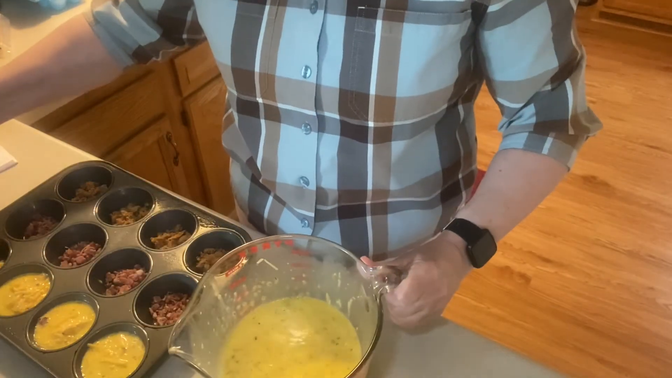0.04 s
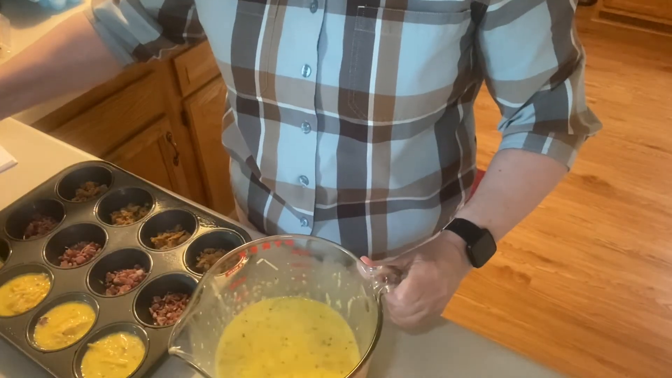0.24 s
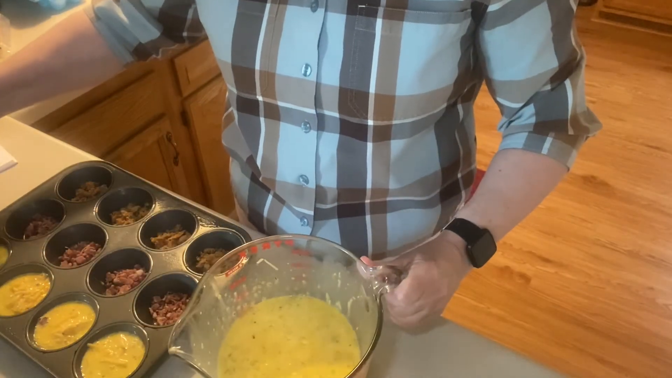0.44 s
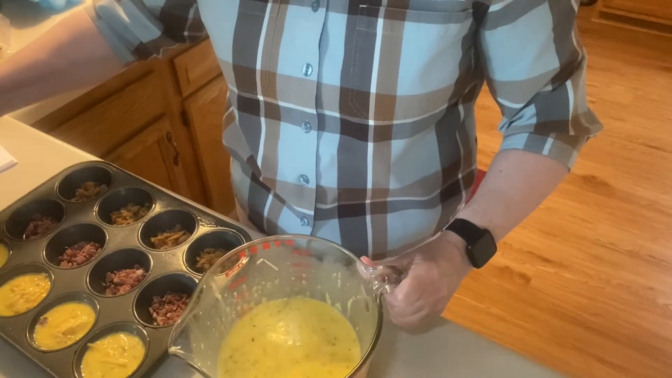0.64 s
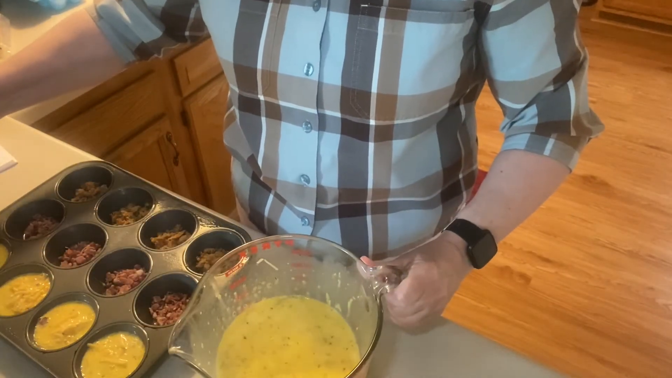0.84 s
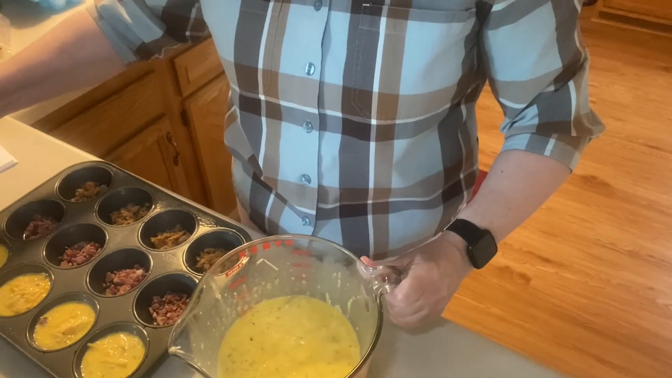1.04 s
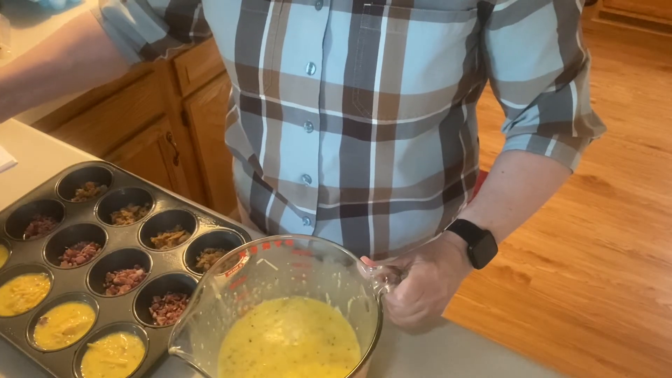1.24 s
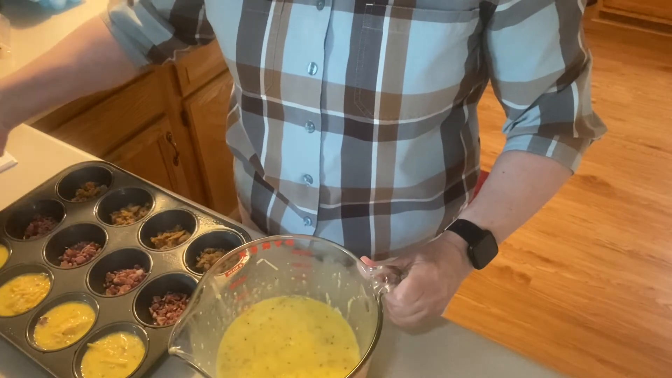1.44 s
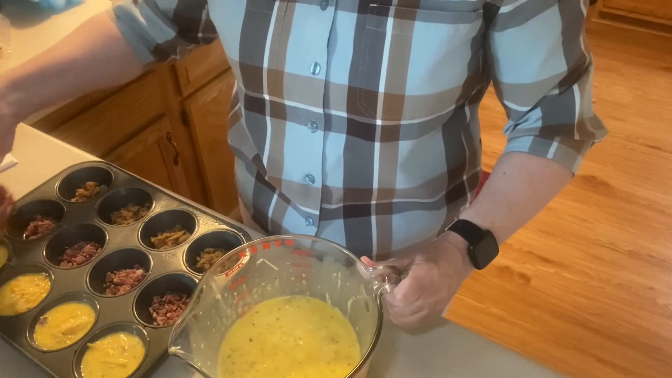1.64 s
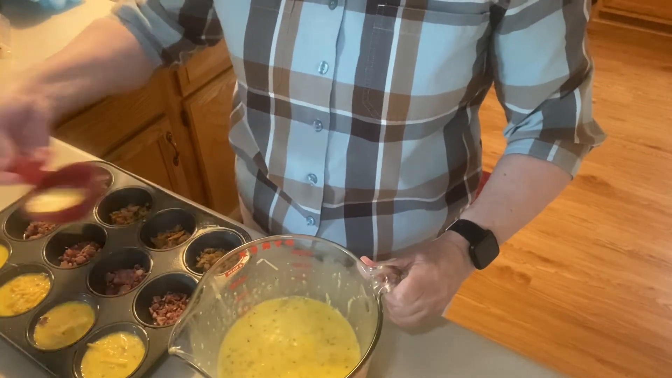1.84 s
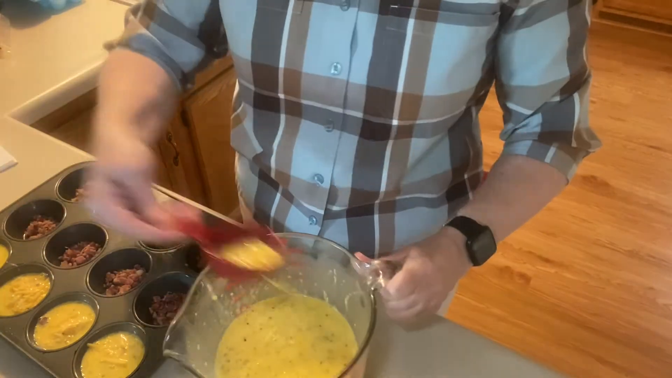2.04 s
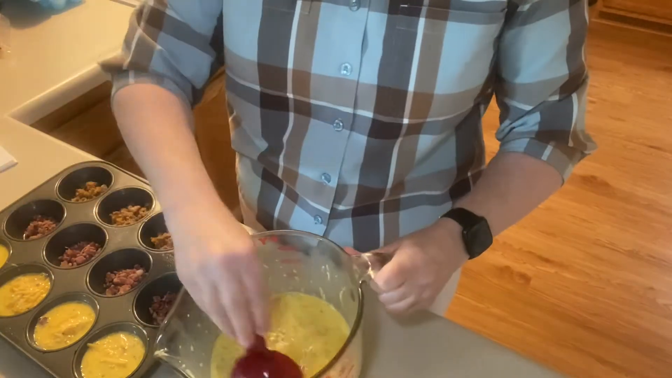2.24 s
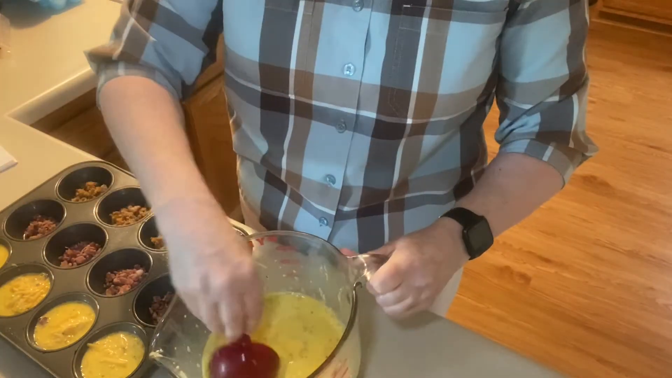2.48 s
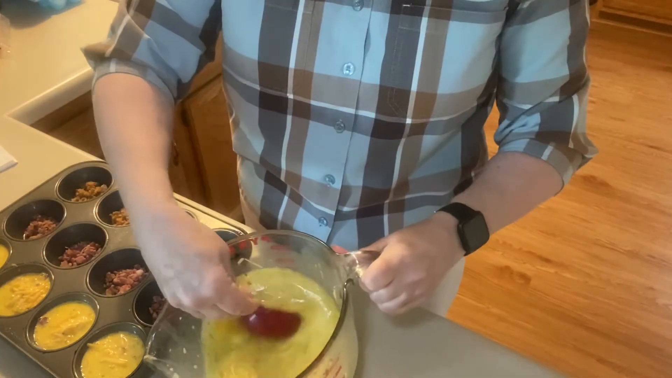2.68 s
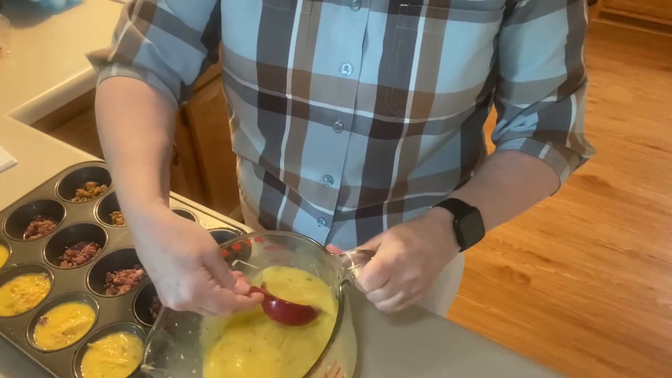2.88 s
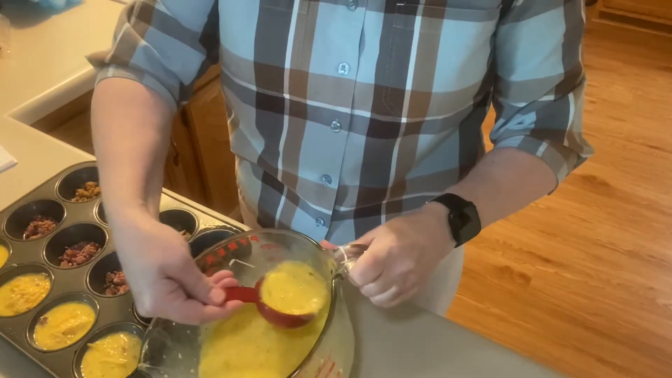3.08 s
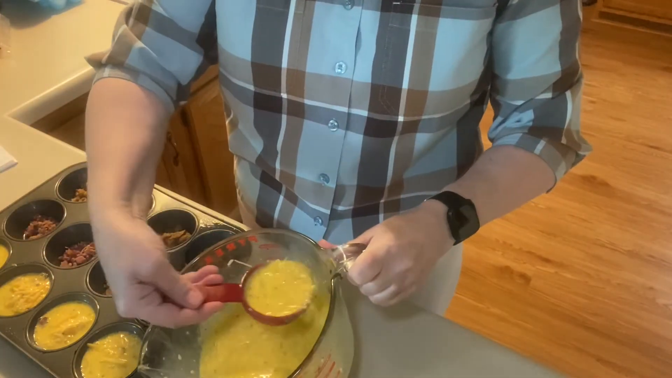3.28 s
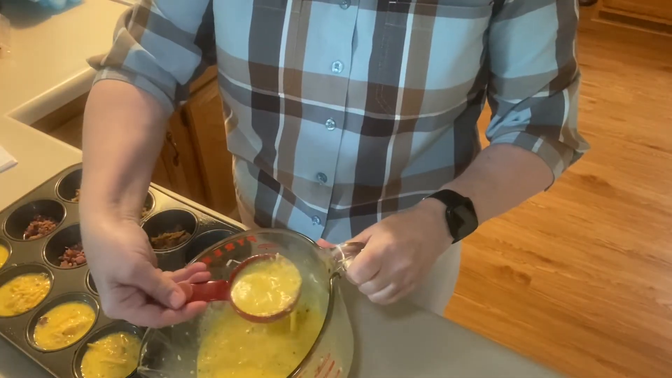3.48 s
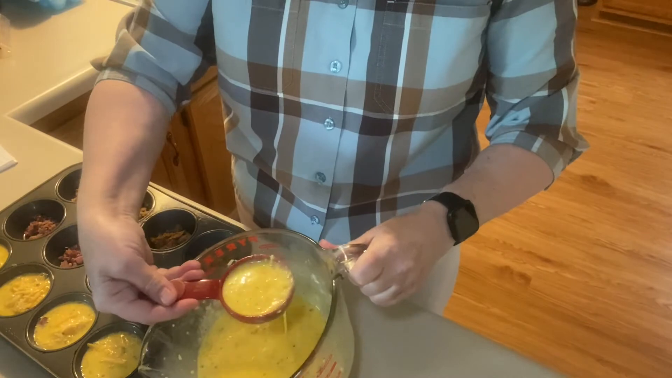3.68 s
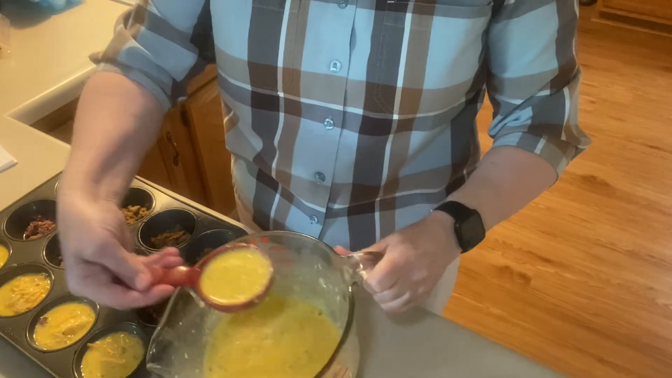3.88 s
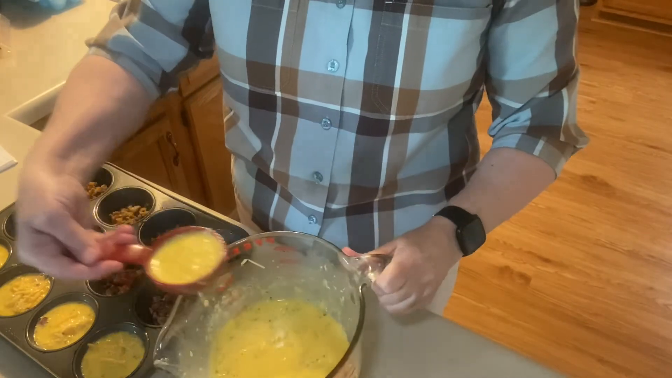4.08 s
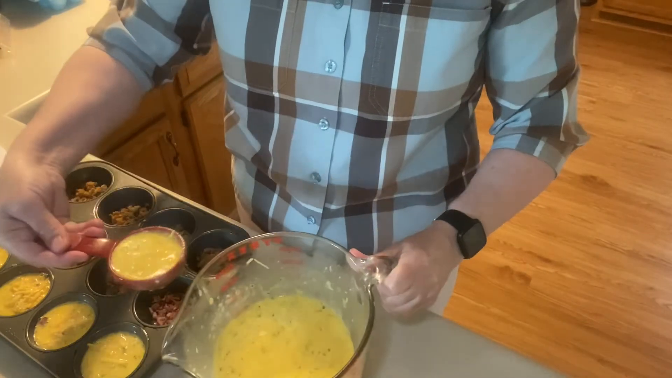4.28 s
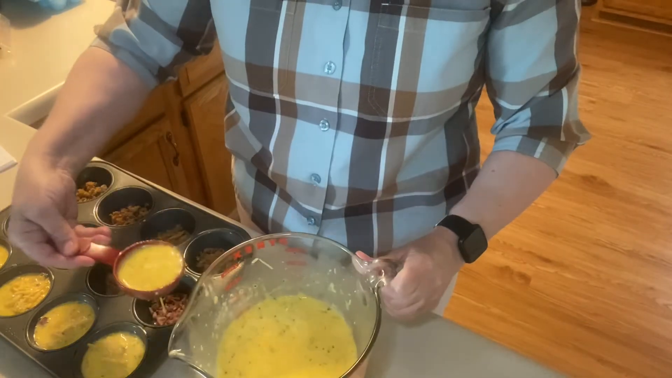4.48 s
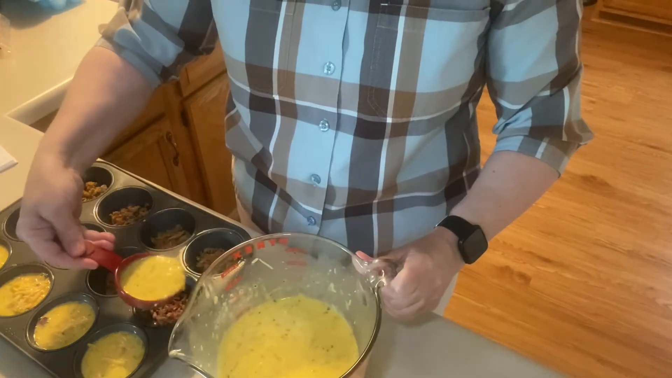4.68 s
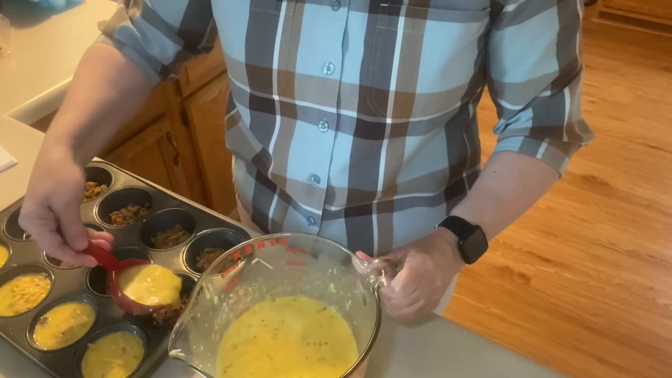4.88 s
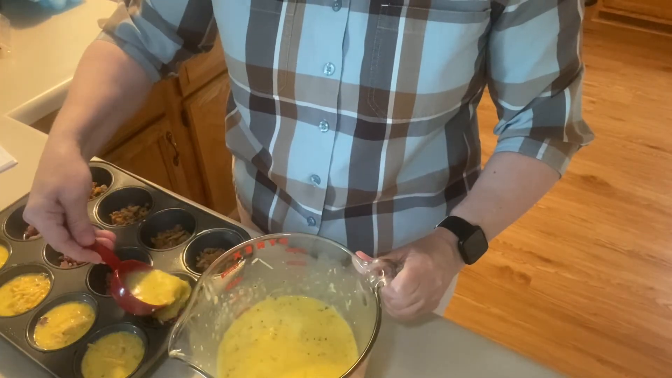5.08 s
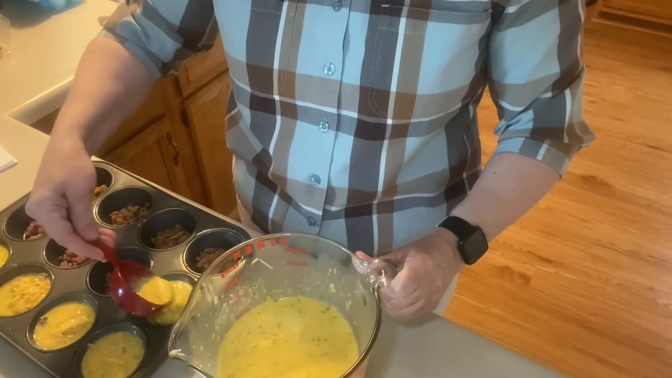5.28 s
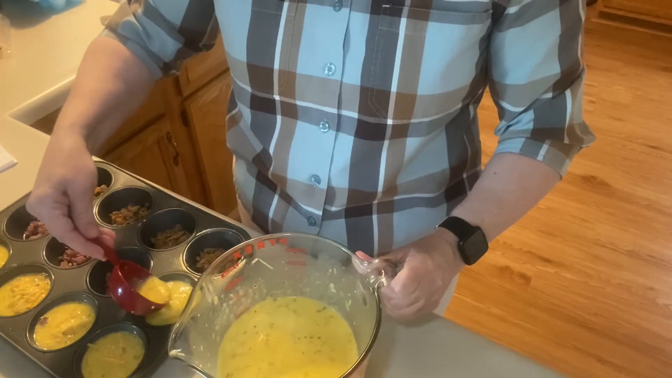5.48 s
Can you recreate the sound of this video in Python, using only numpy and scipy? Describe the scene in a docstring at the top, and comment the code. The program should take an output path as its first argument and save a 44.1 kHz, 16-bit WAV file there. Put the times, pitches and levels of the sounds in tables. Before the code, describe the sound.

A low appliance hum runs throughout a hard-floored kitchen. Faint scuffs come first, then at about two seconds a plastic measuring cup strikes a nearby glass bowl with a very loud, bright double clack. Softer hollow ticks and rubs follow as batter is scooped. Later a dull, heavy thump hits wood, then only faint scuffs and a small tap. Close stereo microphone, short room tail.

```python
"""In a hard-floored kitchen, a plastic measuring cup knocks on a nearby glass bowl, scoops batter and ticks.
Bowl, cup and wood ring as banks of decaying sines, with short bursts of noise for clack, snap and crack.
Something heavy thumps on wood; soft scuffs of band-passed friction noise come and go farther off.
An appliance hums throughout in wavering sine lines over coloured noise, and the room adds a diffuse tail."""
import sys
import numpy as np
from scipy import signal
from scipy.fft import rfft, irfft
from scipy.io import wavfile

SR = 44100
rng = np.random.default_rng(int(sys.argv[2]) if len(sys.argv) > 2 else 0)


def put_to_file(sound):
    """Save the sound as 16-bit audio at rate SR, in the file named by the first command-line argument."""
    columns = np.atleast_2d(sound).T  # one column per channel
    safe = np.clip(columns, -1, 1)
    whole_steps = np.round(safe * 32767)
    wavfile.write(sys.argv[1], SR, whole_steps.astype(np.int16))


N = 243590  # length in samples
SIDES = np.array([[1], [-1]])  # left, right
BINS_HZ = np.fft.rfftfreq(N, 1 / SR)


def from_db(db):
    """Decibels to gain."""
    return 10 ** (np.asarray(db) / 20)


def rms_one(x):
    """Scales a sound to rms 1."""
    return x / np.sqrt(np.mean(x ** 2) + 1e-20)


def at_hz(points, hz):
    """Reads a table's second column along a log-frequency axis."""
    points = np.array(points)
    return np.interp(np.log(hz + 1), np.log(points[:, 0]), points[:, 1])


def band(x, low_hz, high_hz):
    """Band-pass."""
    return signal.sosfilt(signal.butter(2, [low_hz, high_hz], "band", fs=SR, output="sos"), x)


def coloured(spectrum, shape):
    """Noise with the given spectrum along its last axis, at rms 1."""
    white = rfft(rng.standard_normal(shape))
    gain = from_db(at_hz(spectrum, np.fft.rfftfreq(shape[-1], 1 / SR)))
    return rms_one(irfft(white * gain, shape[-1]))


def drift(rate_hz):
    """Slow noise of spread 1: low-passed at one point per 40 samples, then interpolated."""
    r = np.exp(-80 * np.pi * rate_hz / SR)
    slow = signal.lfilter([1], [1, -2 * r, r * r], rng.standard_normal(N // 40 + 2002))
    slow = slow[2000:]  # drop the filter's start
    return np.interp(np.arange(N) / 40, np.arange(len(slow)), rms_one(slow))


def ring(clicks, hz, t60):
    """Two-pole resonator: a unit click sets off a sine of height 1 that falls 60 dB in t60 seconds."""
    r = from_db(-60 / (t60 * SR))
    w = 2 * np.pi * hz / SR
    return signal.lfilter([0, np.sin(w)], [1, -2 * r * np.cos(w), r * r], clicks + 1e-18)


def add(out, s, sound):
    """Mixes a sound in at second s."""
    at = round(s * SR)
    out[..., at:at + sound.shape[-1]] += sound[..., :N - at]


def click(seconds):
    """A unit impulse, then silence."""
    return np.eye(1, round(seconds * SR))[0]


def ports(pair, lag_s, side_db=0):
    """Placement by arrival: the left microphone port hears the source lag_s later and side_db louder."""
    turn = np.pi * BINS_HZ * lag_s  # half the lag on each side
    return irfft(rfft(pair) * np.exp(-1j * turn * SIDES) * from_db(side_db * SIDES / 2), N)


def notch(x, centre_hz, width_hz, depth_db):
    """A bell-shaped dip in the spectrum."""
    offset = (BINS_HZ - centre_hz) / (width_hz / 2)
    return irfft(rfft(x) * from_db(depth_db / (1 + offset ** 2)), N)


def decorrelate(mid, side, alike):
    """Left and right from two independent noises, with the given likeness (-1 to 1)."""
    return np.sqrt(1 + alike) * mid + np.sqrt(1 - alike) * side * SIDES


def hum():
    """Motor lines: sines that waver slightly in level and phase."""
    # steady lines of the appliance: (frequency [Hz], rms level before wavering [dB])
    lines = [(76, -56), (119.5, -56.5), (197, -51), (239, -62.5), (358, -70), (394, -71), (472, -71)]
    t = np.arange(N) / SR
    out = 0
    for hz, db in lines:
        level = np.sqrt(2) * from_db(db + 1.8 * drift(4))
        out = out + level * np.sin(2 * np.pi * hz * t + .45 * drift(3))
    return out


def rumble():
    """Appliance rumble and room hiss: coloured noise, most alike between the channels in the bass."""
    # relative spectrum of the background: (frequency [Hz], density [dB per Hz])
    floor = [(15, -40), (30, -23), (60, -4.5), (80, -5), (150, -12.5), (250, -15.5), (450, -21),
             (800, -30.5), (1200, -38.5), (2000, -50.5), (4000, -59.5), (8000, -59.5), (13000, -60),
             (15500, -71.5)]
    # (frequency [Hz], left-right likeness [0 to 1])
    likeness = [(40, 0.74), (200, 0.86), (500, 0.25), (1500, .4), (5000, 0.17)]
    mid, side = rfft(coloured(floor, (2, N)))
    alike = np.clip(at_hz(likeness, BINS_HZ), 0, 1)
    return irfft(decorrelate(mid, side, alike), N) / np.sqrt(2)


def kitchen(x):
    """Diffuse room tail: noise that dies band by band, shared by the channels mostly in the bass."""
    # reverberation of the room: (frequency [Hz], t60 [s])
    room_t60 = [(100, 0.29), (500, .5), (2000, 0.46), (4000, .45), (6300, 0.33), (9000, .2), (14000, 0.12)]
    # (frequency [Hz], left-right likeness [-1 to 1])
    likeness = [(150, 0.95), (400, 0.68), (700, -.2), (3000, -.1), (9000, 0.16)]
    t = np.arange(round(.9 * SR)) / SR
    edges_hz = 60 * 2 ** np.arange(0, 8.1, .5)  # half-octave bands
    white, tail = rng.standard_normal((2, 2, len(t))), 0
    for k, (low, high) in enumerate(zip(edges_hz, edges_hz[1:])):
        centre_hz = np.sqrt(low * high)
        decay = from_db(-60 * t / at_hz(room_t60, centre_hz))
        mid, side = band(white[k % 2], low, high) * decay
        alike = np.clip(at_hz(likeness, centre_hz), -1, 1)
        tail = tail + decorrelate(mid, side, alike)
    tail = tail * np.clip(t / 0.0073, 0, 1)  # the tail builds over 7.3 ms
    tail = tail / np.sqrt(np.sum(tail ** 2) / 2)
    return signal.fftconvolve(x[None], tail, axes=1)[:, :N]


def scuffs(rows):
    """Friction noise: its own resonance, shared ones and a hiss under an uneven stroke that fades as it slows."""
    # resonances that every scuff excites: (frequency [Hz], width [Hz], level [dB])
    rubbed = [(1050, 400, -4), (1560, 200, -4), (1850, 200, -4), (2450, 300, -6), (4400, 700, -16),
              (1950, 2300, 3)]
    rise_share, slowing_db, stop_t60_s = 0.43, -5.5, 0.071  # rise is a share of the length
    hiss_span = .58  # bottom of the hiss as a share of its top
    out = np.zeros(N)
    for s, level_db, hz, width_hz, length_s, body_db, hiss_db, top_hz in rows:
        t = np.arange(round((length_s + stop_t60_s) * SR)) / SR
        rise = np.clip(t / (rise_share * length_s), 0, 1)
        slowing = slowing_db * t / length_s
        stopping = -60 * np.clip(t - length_s, 0, 1) / stop_t60_s
        stroke = rise * from_db(slowing + stopping)
        noise = rng.standard_normal((3, round(.5 * SR)))[:, :len(t)]
        peak = rms_one(band(noise[0], hz - width_hz / 2, hz + width_hz / 2))
        body = sum(from_db(db) * rms_one(band(noise[1], mode_hz - span_hz / 2, mode_hz + span_hz / 2))
                   for mode_hz, span_hz, db in rubbed)
        hiss = rms_one(band(noise[2], hiss_span * top_hz, top_hz))
        mix = peak + from_db(body_db) * rms_one(body) + from_db(hiss_db) * hiss
        add(out, s, from_db(level_db) * stroke * mix)
    return out * from_db(1.7 * drift(30))


def thump():
    """A soft contact rings low wooden modes under a dull two-channel crack; the floor answers late and low."""
    # the thump and its rebounds: (time [s], level [dB])
    blows = [(4.386, -38), (4.3925, -19), (4.3968, -10.5), (4.405, -13), (4.4105, -14.5), (4.4195, -21),
             (4.431, -31), (4.445, -27), (4.468, -29), (4.53, -44)]
    # modes of the wood: (frequency [Hz], nominal level [dB], t60 [s])
    wood = [(150, -12, .08), (190, -6, 0.07), (213, -5, 0.09), (280, 5, 0.04), (330, 5.5, 0.045),
            (430, -4, .04), (530, -11, .035), (650, -4, 0.035), (790, -5, 0.025), (930, -3, .03),
            (1220, -10, .02), (1500, -9, .02)]
    # relative spectrum of the crack: (frequency [Hz], density [dB per Hz])
    crack_spectrum = [(200, -13), (400, 2), (900, -2), (2400, -20), (6000, -43), (10000, -46), (14000, -60)]
    # modes of the floor: (frequency [Hz], level before the swell [dB], t60 [s])
    floor_modes = [(82, -33, .3), (122, -35, .28)]
    boom_swell_s = .025
    out = np.zeros((2, N))
    t = np.arange(round(.4 * SR)) / SR
    soft = signal.lfilter(*signal.butter(2, [110, 1600], "band", fs=SR), click(.4))
    modes = np.array([from_db(db) * ring(soft, hz, t60) for hz, db, t60 in wood])
    for s, level_db in blows:
        rings = from_db(rng.normal(0, 1.5, len(wood))) @ modes  # each blow has its own mode strengths
        crack = coloured(crack_spectrum, (2, len(t)))
        crack = crack * from_db(-60 * t / 0.047) * np.clip(t / 0.00094, 0, 1)
        add(out, s, from_db(level_db) * (rings / np.abs(rings).max() + from_db(-9) * crack))
    boom = sum(from_db(db) * ring(click(.4), hz, t60) for hz, db, t60 in floor_modes)
    add(out, blows[2][0], boom * np.clip(t / boom_swell_s, 0, 1))
    return out


def ticks():
    """Each tap rings the cup modes near the pitch its spot favours, plus a snap of noise a few ms long."""
    # taps of the cup on rim and batter: (time [s], level [dB], favoured pitch [Hz], reach [octaves],
    # snap level [dB], snap centre [Hz])
    taps = [(0.215, -58, 3300, 0.25, -2, 4500), (0.223, -64, 1860, .15, -14, 2500),
            (2.12, -53, 3200, 0.28, -1, 6000), (2.148, -54, 1460, .2, 18, 8540),
            (2.3775, -30, 1600, 1.1, -16, 3000), (2.401, -42, 1450, .3, -14, 2000),
            (2.431, -49, 1400, .2, -16, 2500), (2.465, -48, 1400, .2, -14, 2000),
            (2.479, -50.5, 1300, 0.25, -17, 10000), (2.551, -61, 900, 0.35, -4, 8000),
            (2.671, -45, 1500, 1, -12, 1990), (2.714, -49, 1400, .9, -20, 2210),
            (2.7766, -26, 1350, .7, -26, 1480), (2.885, -55.5, 1510, 0.12, -14, 1697),
            (2.973, -58.5, 1750, 0.28, -16, 2000), (3.174, -46, 1340, .1, -23, 8000),
            (3.1745, -60, 2700, .1, -20, 3500), (3.325, -76, 2600, 0.27, 15.5, 12530),
            (4.589, -47, 640, 0.17, -23.5, 1400)]
    # the cup's own modes: (frequency [Hz], level [dB], t60 [s])
    cup = [(640, -11, 0.035), (756.6, 9, 0.018), (1365, -2, 0.02), (1600, 2, .012), (1860, -8, .014),
           (2165, 0, 0.014), (2700, -4, .016), (3400, -5, .01)]
    snap_octaves, snap_t60_s = 1, 0.012  # half width of the snap; its decay
    softness = 1.8  # contact cut as a multiple of the pitch
    swell_s = .0015  # a tap builds over its contact time
    out = np.zeros(N)
    t = np.arange(round(.2 * SR)) / SR
    for s, level_db, hz, reach, snap_db, snap_hz in taps:
        contact = signal.butter(2, softness * hz, fs=SR)
        soft = signal.lfilter(*contact, signal.lfilter(*contact, click(.2)))  # a rounded contact
        rings = 0
        for k, (mode_hz, db, t60) in enumerate(cup):
            distance = np.log2(mode_hz / hz) / reach  # from the favoured pitch
            rings = rings + (-1) ** k * from_db(db - 7.1 * distance ** 2) * ring(soft, mode_hz, t60)
        rings = rings * np.clip(t / swell_s, 0, 1)
        low, high = snap_hz / 2 ** snap_octaves, min(snap_hz * 2 ** snap_octaves, 15800)
        snap = rms_one(rng.standard_normal(len(t))) * from_db(-60 * t / snap_t60_s)
        snap = band(band(snap, low, high), low, high)
        snap = snap * np.sqrt(SR / 2 / (high - low))  # make up for the narrow band
        add(out, s, from_db(level_db) * (rings / np.abs(rings).max() + from_db(snap_db) * snap))
    return out


def bowl():
    """Each knock rings all glass modes with its own strengths, plus a brief clack; softer blows are duller."""
    # cup on bowl: (time [s], level [dB], left-right difference [dB])
    knocks = [(2.1929, -2, 1.5), (2.1963, -6.5, -2.5), (2.2088, -21, 0), (2.3775, -37, -1),
              (2.426, -43, -6)]
    # modes of the glass: (frequency [Hz], nominal level [dB], t60 [s])
    glass = [(340, -13, 0.02), (440, -12, .025), (540, -26, 0.25), (573, -29, 0.65), (592, -34, 0.5),
             (728, -10, 0.03), (958, -15, 0.04), (1230, -6, 0.03), (1340, 0, 0.045), (1410, -21, .25),
             (1592, -22, .3), (1922, -20, .1), (1576, 0, .05), (2065, -6, 0.08), (2160, -5, .05),
             (2232, -6, 0.1), (2256, -19, .3), (2295, -12, .1), (2378, -14, 0.1), (2480, -6, .03),
             (2603, -4, 0.12), (2760, -20, 0.2), (2865, -5, 0.03), (3320, -7, 0.025), (3610, -21, .12),
             (4045, -16, .09), (4360, -27, .3), (4420, -3, .025), (5965, 1, 0.035), (5972, -21, .25),
             (6290, -10, .05), (6440, 3, 0.03), (6456, -23, .3), (6570, -10, .05), (6940, -16, .03),
             (7890, -16, 0.028), (9200, -3, .02), (13350, -12, .03)]
    # relative spectrum of the plastic clack: (frequency [Hz], density [dB per Hz])
    clack_spectrum = [(500, -20), (1300, -4), (1750, -14), (2500, -8), (4400, -9.5), (6200, -7),
                      (8000, -19), (13000, -22), (15000, -44)]
    # counter reflection cancels the bowl here: (centre [Hz], width [Hz], depth [dB])
    counter_notch = (5150, 700, -24)
    contact_bottom_hz, contact_top_hz = 250, 17000  # top is for a 0 dB blow
    dulling = .42  # dB of band top lost per dB of blow
    out = np.zeros((2, N))
    t = np.arange(round(.5 * SR)) / SR
    modes = np.array([(-1) ** k * from_db(db) * ring(click(.5), hz, t60)
                      for k, (hz, db, t60) in enumerate(glass)])
    for s, level_db, pan_db in knocks:
        rings = from_db(rng.normal(0, 0.88, len(glass))) @ modes
        clack = coloured(clack_spectrum, (len(t),)) * from_db(-60 * t / 0.017)
        top_hz = min(contact_top_hz * from_db(dulling * level_db), 20000)
        knock = rings / np.abs(rings).max() + from_db(-3.5) * clack
        knock = band(knock, contact_bottom_hz, top_hz)
        add(out, s, from_db(level_db) * knock * from_db(pan_db * SIDES / 2))
    return notch(out, *counter_notch)


def scene():
    """Near bowl and cup, thump and far scuffs with their room tail, over the appliance."""
    # far scuffs: (time [s], level [dB], resonance [Hz], width [Hz], length [s],
    # shared resonances [dB], hiss [dB], hiss top [Hz])
    far_strokes = [(0.15, -72, 2850, 1000, 0.1, -1, -12, 11000),
                   (0.45, -72, 2400, 500, .036, -6, -25, 8400),
                   (0.738, -81, 2450, 1200, 0.035, 6, -12, 7000),
                   (0.782, -67.5, 2450, 597, .04, -8, -31, 7600),
                   (0.82, -53.5, 1950, 400, 0.063, -3, -33, 8000),
                   (1.383, -76, 1800, 900, 0.042, -6, -21, 9000),
                   (1.551, -71, 1970, 800, 0.084, -16, -26, 8300),
                   (1.716, -57, 2200, 1200, 0.1, -3, -9.5, 12000),
                   (1.837, -60.5, 2200, 1200, 0.062, -8, -13, 12000),
                   (2.068, -66, 2170, 1500, 0.33, 1, 1, 13200),
                   (2.52, -69, 2050, 1500, 0.2, -6.5, -1, 14000),
                   (2.786, -71.5, 1500, 700, 0.1, -5, -10, 11000),
                   (3.174, -73.5, 2570, 1400, 0.034, -4, -12, 10500),
                   (3.34, -66.5, 2750, 500, .1, -8, 1, 10500), (3.567, -79, 2300, 497, 0.11, -7, -16, 9900),
                   (3.707, -68, 2520, 450, 0.1, 6, -10, 9000),
                   (3.905, -66, 2800, 450, 0.06, -4.5, -4.5, 9000),
                   (4.23, -78, 2200, 899, 0.073, 0.5, -14, 10000),
                   (4.736, -74.5, 2505, 1200, 0.054, -4.5, -18, 6000),
                   (4.868, -61, 2300, 500, 0.085, 5, -23, 7500),
                   (5.075, -65.5, 2330, 800, 0.061, -4, -28, 6000)]
    # the cup rubs the bowl close by: columns as for the far scuffs
    near_strokes = [(2.385, -59, 2600, 700, .13, -2, -14, 7000),
                    (2.664, -58, 1800, 600, .054, -8, -22, 9000)]
    # left lag of the bowl, longer in the treble: (frequency [Hz], lag [s])
    bowl_lag = [(1000, .00002), (3000, .000026), (6400, .000033), (9300, .000035), (11500, .000068),
                (14000, .000066)]
    # sides of bowl, thump and appliance: (frequency [Hz], left-right difference [dB])
    bowl_side = [(300, 1.5), (2500, 0), (5000, -3.5), (7200, -4), (10400, 0)]
    thump_side = [(200, 4), (400, 0)]
    appliance_side = [(200, 1), (600, -2)]
    thump_lag_s, appliance_lag_s = .0004, .00045

    steady = hum() + from_db(-50.5) * rumble()
    far = scuffs(far_strokes)
    low = thump()
    small = ticks() + scuffs(near_strokes)
    knocks = bowl()

    # sends to the room
    wet = from_db(-10) * knocks.mean(axis=0) + from_db(-16) * small
    wet = wet + from_db(-9.5) * low.mean(axis=0) + from_db(-1.0) * far

    appliance = ports(steady, appliance_lag_s, at_hz(appliance_side, BINS_HZ))
    wooden = ports(low, thump_lag_s, at_hz(thump_side, BINS_HZ))
    near = ports(knocks + small, at_hz(bowl_lag, BINS_HZ), at_hz(bowl_side, BINS_HZ))
    return near + wooden + from_db(-4.0) * far + kitchen(wet) + appliance


def record(dry):
    """A notch from the microphone port, a treble roll-off, rounded peaks, then a steep cut at the top."""
    # (centre [Hz], width [Hz], depth [dB])
    port_notch = (10500, 990, -25.5)
    headroom, cutoff_hz = .97, 16700  # peaks round off toward the headroom
    rolled = signal.lfilter(*signal.butter(2, 15500, fs=SR), notch(dry, *port_notch))
    rounded = rolled / (1 + (rolled / headroom) ** 4) ** (1 / 4)
    return signal.sosfilt(signal.cheby2(12, 70, cutoff_hz, fs=SR, output="sos"), rounded)


dry = scene()
out = record(dry)
put_to_file(out)
```